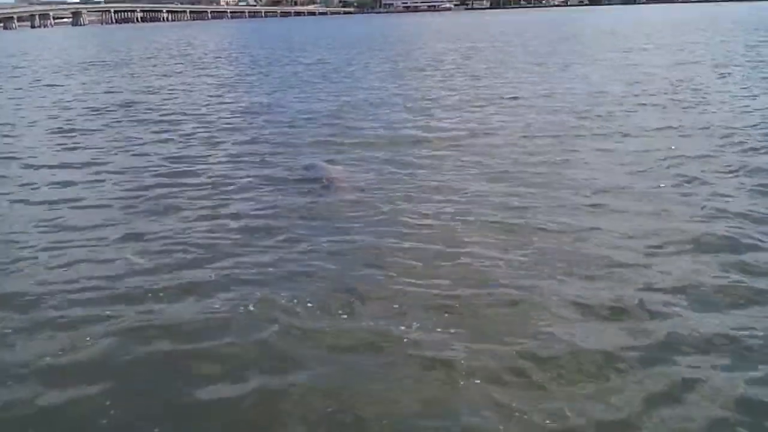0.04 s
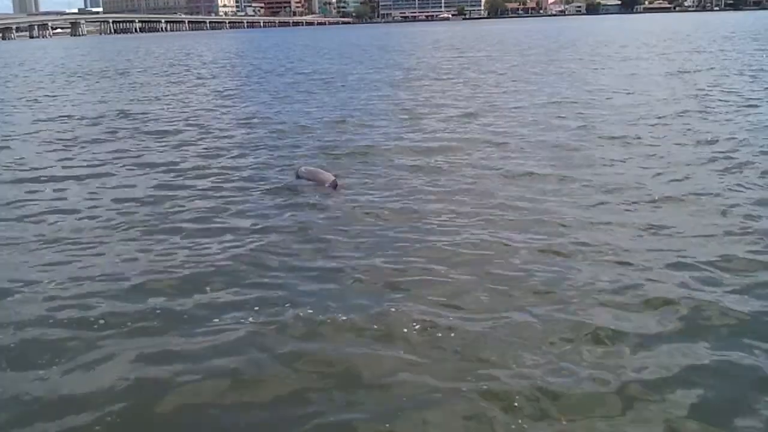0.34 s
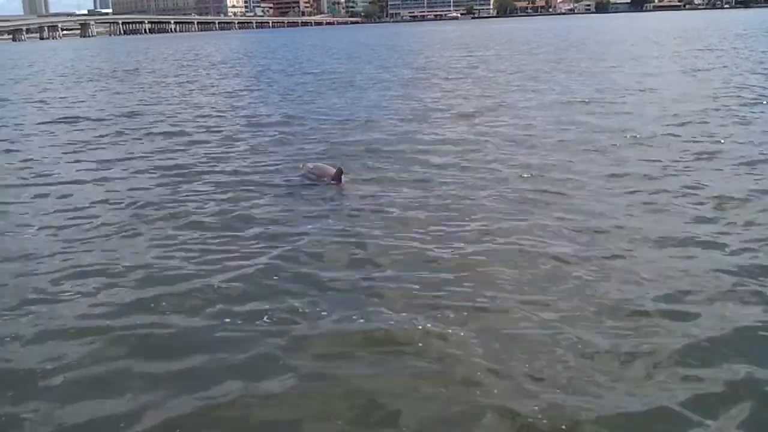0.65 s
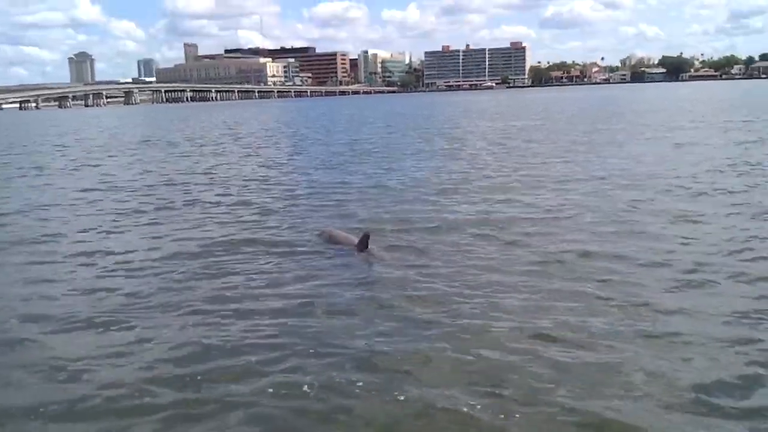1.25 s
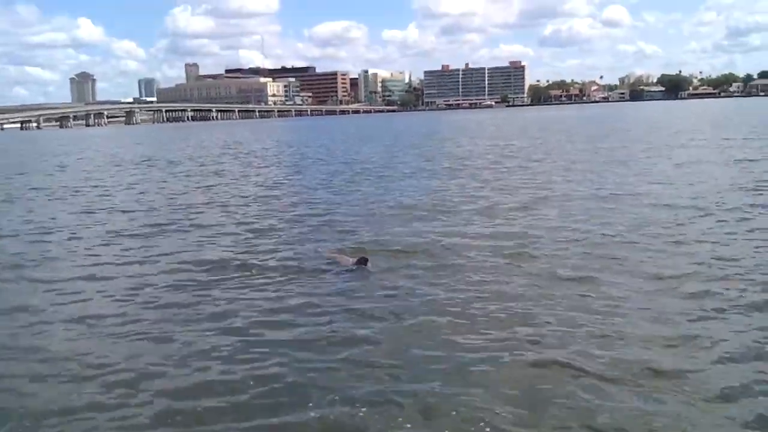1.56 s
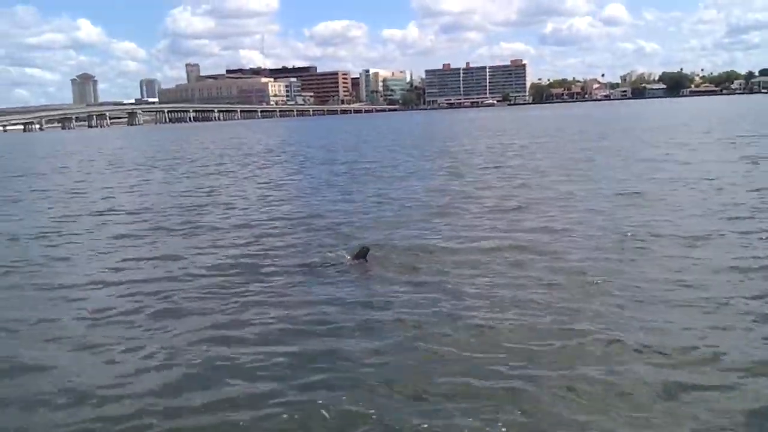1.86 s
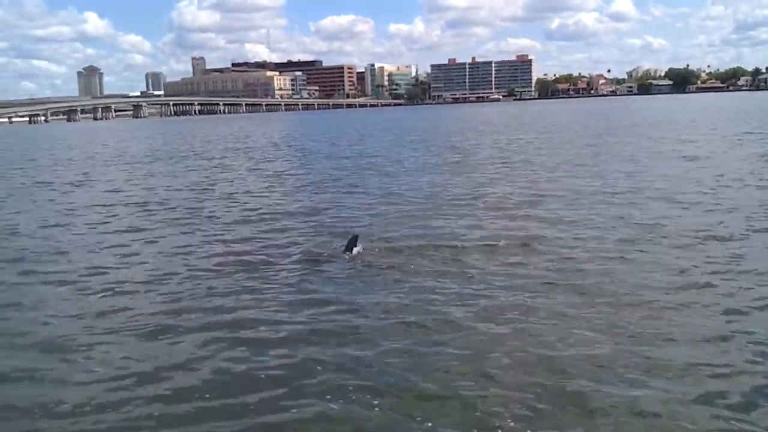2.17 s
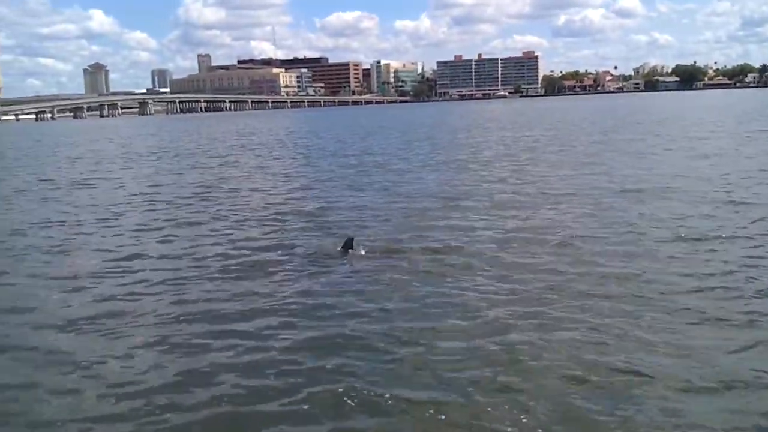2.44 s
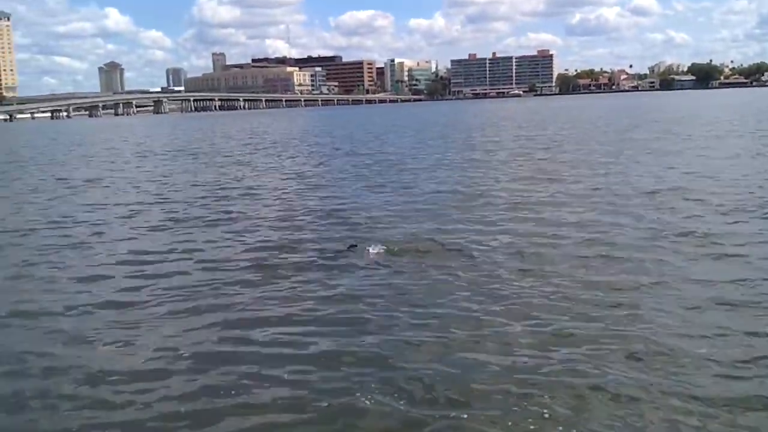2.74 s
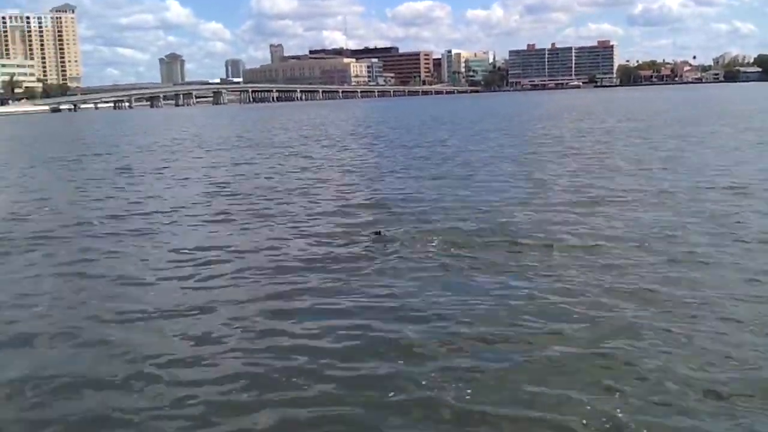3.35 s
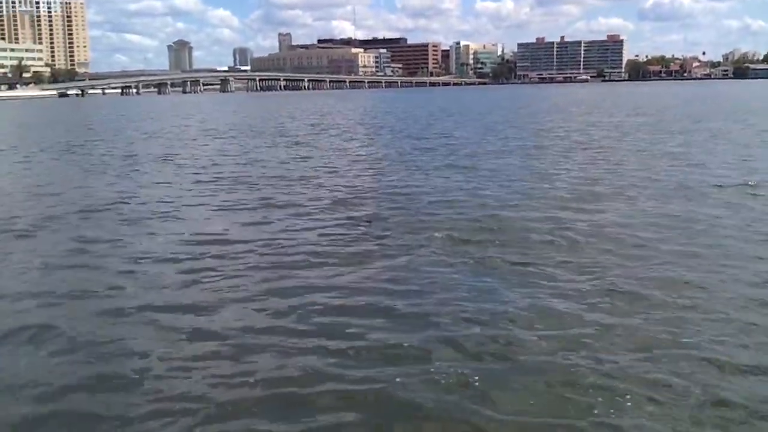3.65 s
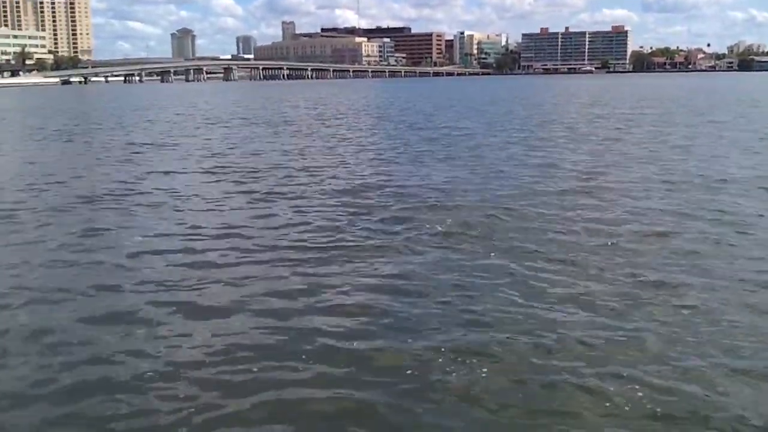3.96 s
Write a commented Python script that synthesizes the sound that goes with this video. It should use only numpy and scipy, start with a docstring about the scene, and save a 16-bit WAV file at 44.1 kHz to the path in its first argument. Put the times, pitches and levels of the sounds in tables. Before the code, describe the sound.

Low wind rumbles on the microphone throughout, over a distant traffic drone and faint wavelets lapping close by with tiny bubbles and drips. From about 1.1 to 1.5 seconds a dolphin blows once, a soft rush of air and spray. The wind buffets hardest between 1.4 and 1.9 seconds. From about 3.3 seconds to the end at 4, a low, hollow noise swells with soft water gurgles.

```python
"""Wind buffets the microphone in low eddies, over open water in a city bay on a breezy day.
Close by, wavelets lap in clusters of small ringing bubbles, with ticks of spray and soft gurgles.
Far off, the town drones with traffic and machinery, and a bird whistles faintly. Once, a rush of
air and spray swells and fades, probably the blow of a surfacing dolphin. Low, hollow noise swells
near the end."""
import sys
import numpy as np
from scipy import signal
from scipy.fft import rfft, irfft
from scipy.io import wavfile

SR = 44100
rng = np.random.default_rng(int(sys.argv[2]) if len(sys.argv) > 2 else 0)


def pcm_store(signal):
    """Save signal as 16-bit PCM."""
    levels = np.round(np.clip(np.atleast_2d(signal), -1, 1) * 32767)
    wavfile.write(sys.argv[1], SR, levels.astype(np.int16).T)


N = 176400
TIME = np.arange(N) / SR
BINS = np.fft.rfftfreq(N, 1 / SR)
CUTOFF_HZ = 8350

# Far wash of town and water. Each row: frequency in Hz, relative level in dB.
DRONE_SPECTRUM = [(20, -8.5), (60, 5.5), (125, -3.5), (180, -1), (280, -3), (380, -7), (470, -8.5),
                  (570, -11), (850, -12.5), (1200, -26), (1800, -29.5), (3000, -35.5), (4500, -42.5),
                  (7300, -43), (8500, -53.5)]
# Drift of that wash. Each row: time in seconds, gain in dB.
DRONE_GAIN = [(0, 1), (.5, 0.5), (1.0, 1), (1.5, 2), (2.1, 1), (2.7, 0.8), (3.2, 1.5), (3.7, -2), (4, 1)]
# Far traffic. Each row: frequency in Hz, relative level in dB.
TRAFFIC_SPECTRUM = [(50, -12), (95, 8), (150, -9), (500, -10.5), (850, -1), (1250, -10.5), (2000, -24),
                    (5000, -51.5)]
# Its swell. Each row: time in seconds, level in dB.
TRAFFIC_SWELL = [(0, -67.5), (1, -63.5), (1.8, -61), (2.4, -61.5), (2.9, -61.5), (3.3, -66), (4, -67.5)]
# Distant machinery. Each row: pitch in Hz, base level in dB, half width in Hz.
HUM_RINGS = [(177, -60.5, 9.9), (190.8, -63.5, 13), (269, -64.5, 11), (420.4, -67, 7.3), (1059, -77.5, 8.6),
             (2198, -87.5, 13)]
# Drift of its hum. Each row: time in seconds, gain in dB.
HUM_GAIN = [(0, -1), (1.5, -1), (2.1, -1), (2.85, 2.5), (3.3, 2), (4, -2)]
# Wind on the microphone. Each row: frequency in Hz, relative level in dB.
WIND_SPECTRUM = [(8, 6), (25, 0.5), (50, -6), (85, -8.5), (120, -20.5), (200, -22), (400, -39),
                 (1000, -55.5), (3000, -75)]
# Its strength. Each row: time in seconds, level in dB.
WIND_STRENGTH = [(0, -35.5), (.1, -37), (.3, -43), (.62, -44.5), (1.1, -40.5), (1.34, -40), (1.56, -49),
                 (1.74, -46.5), (1.86, -40.5), (2.0, -46), (2.9, -47.5), (3.15, -44), (3.35, -51),
                 (3.6, -45.5), (4, -43.5)]
# Single buffets. Each row: centre and length in seconds, level in dB, upper edge in Hz.
WIND_BUFFETS = [(0.036, 0.045, -39, 91), (0.217, 0.071, -40.5, 70), (0.246, 0.037, -44, 60),
                (1.404, 0.057, -33, 151), (1.511, 0.016, -32, 120), (1.536, 0.024, -31, 140),
                (1.586, 0.041, -34, 150), (1.656, 0.039, -36, 130), (1.809, .035, -34, 170),
                (1.843, 0.019, -45, 90), (3.158, 0.032, -44, 60), (3.573, 0.02, -41.5, 110)]
# Wavelets close by. Each row: centre and half length in seconds, strength in dB.
WAVELETS = [(0.032, .06, -73), (0.263, 0.025, -60.5), (0.603, 0.018, -62.5), (0.735, 0.068, -63),
            (1.239, 0.012, -54), (1.364, 0.084, -62), (1.55, 0.054, -62), (1.688, 0.035, -61),
            (2.096, 0.14, -68.5), (2.436, 0.13, -68.5), (2.806, 0.12, -63.5), (2.974, 0.089, -65),
            (3.08, .04, -64.5), (3.526, 0.11, -66.5), (3.618, 0.049, -64.5), (3.732, 0.063, -66.5),
            (3.95, .08, -79)]
# Clouds of small bubbles. Each row: pitch in Hz, relative weight in dB.
CLOUD_WEIGHTS = [(600, 0.5), (1100, 3), (1900, 0), (3000, 4.5), (4300, -5), (7500, -12)]
# Fizz of a wavelet. Each row: frequency in Hz, relative level in dB.
FIZZ_SPECTRUM = [(400, 8.5), (800, 10.5), (1300, 20), (2000, 5), (3100, 10), (4300, 2), (6500, -17.5),
                 (8500, -9.5)]
# The clearest bubbles. Each row: start in seconds, pitch in Hz, peak in dB, decay time in cycles.
CLEAR_BUBBLES = [(.259, 2400, -50, 3.3), (.356, 4560, -54, 4.3), (0.6156, 2200, -46, 3.4),
                 (0.6184, 2250, -48, 2.5), (.686, 2700, -48, 7), (.7175, 5100, -55, 5),
                 (0.72, 4900, -49.5, 2.9), (.7208, 1070, -48.5, 6.4), (.7314, 5500, -64, 3.2),
                 (0.755, 2730, -49.5, 5.6), (1.1579, 2870, -45.5, 5.9), (1.174, 1300, -44, 1.5),
                 (1.2374, 3190, -49, 9.4), (1.304, 2680, -51, 5.7), (1.3616, 1190, -38.5, 1.9),
                 (1.373, 6100, -50, 5.9), (1.46, 5340, -56, 5.4), (1.53, 3140, -56, 4.6),
                 (1.611, 2850, -45.5, 6.4), (1.6605, 2810, -52, 5.5), (2.0178, 2700, -53, 7.4),
                 (2.11, 2860, -45, 2), (2.4694, 1800, -55.5, 4.9), (2.6618, 2390, -53, 7),
                 (2.6625, 4480, -54.5, 5.1), (2.6846, 3120, -49, 4), (2.6916, 3080, -52, 5),
                 (2.709, 1070, -48, 5.6), (2.809, 2600, -52, 3), (2.889, 6100, -45.5, 1.3),
                 (2.9055, 1700, -50.5, 2.3), (3.0254, 3300, -50.5, 2.9), (3.037, 1150, -46, 2.7),
                 (3.043, 1300, -50, 4), (3.0518, 2600, -55, 3), (3.5149, 2600, -50, 3.4),
                 (3.5352, 2720, -54, 6.9), (3.598, 1670, -45, 2.5), (3.6152, 6600, -62, 4.8),
                 (3.6428, 1900, -49, 3), (3.8856, 2100, -49, 2)]
# Drops of spray. Each row: start in seconds, peak in dB.
SPRAY_TICKS = [(.259, -59), (0.307, -59), (0.609, -58), (.732, -55.5), (.761, -58), (1.966, -57),
               (2.602, -54), (2.784, -59), (2.8907, -51), (3.102, -68), (3.615, -56), (3.628, -55.5)]
# Gurgles. Each row: centre and length in seconds, pitch in Hz, peak in dB, glide in octaves a second.
WATER_GURGLES = [(0.71, 0.027, 630, -49, 1.5), (1.23, 0.047, 491, -57, 1.5), (3.401, .04, 590, -52.5, -5),
                 (3.415, .025, 317, -49.5, 0.5), (3.565, .04, 511.6, -54, -0.5),
                 (3.661, .04, 433, -49, -5.5), (3.722, 0.052, 450, -50.5, 0.5),
                 (3.877, 0.054, 312.3, -47.5, -5)]
# A far bird. Each row: start and length in seconds, top pitch and opening sag in Hz,
# place of the top from 0 to 1, peak in dB.
BIRD_WHISTLES = [(0.715, 0.14, 7220, 710, 0.9, -81), (0.857, 0.055, 7200, 228, 0.4, -80)]
# Rushing air of the blow. Each row: frequency in Hz, relative level in dB.
BLOW_SPECTRUM = [(200, -5.5), (500, 3), (800, 5), (1150, -2), (1500, -5), (1950, -7), (2300, -13),
                 (3300, -9.5), (4500, -26.5), (6500, -26), (8500, -39)]
# Its resonances. Each row: pitch in Hz, level at full blow in dB, half width in Hz.
BLOW_RESONANCES = [(1063, -59, 25), (1125, -61, 34), (1370, -64, 110), (1631, -68.5, 18), (2230, -68.5, 33)]
# Hiss of the blown spray. Each row: frequency in Hz, relative level in dB.
MIST_SPECTRUM = [(1000, -19.5), (3000, 4.5), (5000, -4.5), (6500, -3), (8500, -6.5)]
# Its swell. Each row: time in seconds, level in dB.
MIST_SWELL = [(1.0, -100), (1.16, -72), (1.24, -73), (1.31, -73), (1.375, -68), (1.44, -78.5), (1.7, -100)]
# Low, hollow noise. Each row: frequency in Hz, relative level in dB.
HOLLOW_SPECTRUM = [(150, -15), (250, -2), (310, 5.5), (380, -9), (450, 0), (600, -8.5), (900, -26.5),
                   (3000, -63)]
# Its late swell. Each row: time in seconds, level in dB.
HOLLOW_SWELL = [(0, -76.5), (3.1, -70), (3.4, -56.5), (3.7, -54), (4, -62)]


def amp(db):
    """Decibels to gain."""
    return 10 ** (np.asarray(db) / 20)


def unit(x):
    """Scales to rms 1."""
    return x / np.sqrt(np.mean(x ** 2) + 1e-20)


def spectrum(points, hz):
    """Gain of a (Hz, dB) table on a log-frequency axis."""
    f, db = np.transpose(points)
    return amp(np.interp(np.log(hz + 1), np.log(f + 1), db))


def level(points):
    """Gain over time from a (s, dB) table."""
    return amp(np.interp(TIME, *np.transpose(points)))


def noise(gain):
    """Noise of rms 1 with the given gain per frequency."""
    return unit(irfft(rfft(rng.standard_normal(N)) * gain, N))


def wander(rate_hz):
    """Slow random drift of rms 1."""
    return noise(1 / (1 + (BINS / rate_hz) ** 2) ** 2)


def rings(table):
    """Noise in narrow resonances."""
    return sum(amp(db) * noise(1 / (1 + ((BINS - hz) / width) ** 2)) for hz, db, width in table)


def add(mix, s, sound):
    """Mixes a sound in at time s."""
    part = mix[max(round(s * SR), 0):][:len(sound)]
    part += sound[:len(part)]


def far_town(wash_db=-49, waver_db=1.0):
    """The town from across open water: a wavering wash, a swell of traffic, a faint machine hum."""
    wash = amp(wash_db + waver_db * wander(14)) * noise(spectrum(DRONE_SPECTRUM, BINS))
    traffic = level(TRAFFIC_SWELL) * noise(spectrum(TRAFFIC_SPECTRUM, BINS))
    hum = level(HUM_GAIN) * rings(HUM_RINGS)
    return level(DRONE_GAIN) * wash + traffic + hum


def wind(lumpy_db=1.8, buffet_low_hz=34):
    """Turbulence rumbles right on the microphone, with short buffets; smaller eddies reach higher."""
    colour = spectrum(WIND_SPECTRUM, BINS)
    out = level(WIND_STRENGTH) * amp(lumpy_db * wander(12)) * noise(colour)
    low_cut = BINS ** 2 / (BINS ** 2 + buffet_low_hz ** 2)
    for centre, length, db, edge_hz in WIND_BUFFETS:
        eddies = noise(colour * low_cut / np.sqrt(1 + (BINS / edge_hz) ** 2))
        shape = np.exp(-(2 * (TIME - centre) / length) ** 2)
        buffet_rms = np.sqrt(np.average(eddies ** 2, weights=shape ** 2))
        out += amp(db) * shape * eddies / buffet_rms
    return out


def bubble(hz, cycles, rise=0.1, glide=0.04, splash_db=-21, splash_s=0.0028):
    """A bubble rings for a few cycles, rising slightly in pitch, with a tiny splash."""
    t = TIME[:1400]
    age = t * hz / cycles  # in decay times, the scale for rise and glide
    pitch = hz * (1 + glide * np.minimum(age, 2))
    shape = (1 - np.exp(-(age / rise) ** 2)) * np.exp(-age)
    ring = shape / shape.max() * np.sin(2 * np.pi * np.cumsum(pitch) / SR)
    band = signal.butter(1, [hz / 2, min(hz * 2, SR / 3)], "band", fs=SR)
    splash = unit(signal.lfilter(*band, rng.standard_normal(len(t))))
    return ring + amp(splash_db) * splash * np.exp(-t / splash_s)


def wavelets(pitches=28, bubbles_per_s=800, spread_db=4.6, calm_db=-74, cloud_db=-2.5, fizz_db=-5):
    """Close by, each wavelet frees a cloud of small bubbles and some fizz; a few bubbles stand out."""
    lap_power = sum(amp(db) ** 2 * np.exp(-((TIME - s) / half) ** 2) for s, half, db in WAVELETS)
    stir = np.sqrt(amp(calm_db) ** 2 + lap_power)
    cloud = np.zeros(N)
    for hz in np.geomspace(600, 7500, pitches):
        births = rng.random(N) < bubbles_per_s / pitches / SR
        strengths = amp(spread_db * np.minimum(rng.exponential(1, N), 3))
        pops = signal.oaconvolve(births * strengths, bubble(hz, cycles=rng.uniform(1, 4.5)))[:N]
        cloud += np.sqrt(hz) * spectrum(CLOUD_WEIGHTS, hz) * pops
    fizz = noise(spectrum(FIZZ_SPECTRUM, BINS))
    out = stir * (amp(cloud_db) * unit(cloud) + amp(fizz_db) * fizz)
    for start, hz, db, cycles in CLEAR_BUBBLES:
        add(out, start, amp(db) * bubble(hz, cycles))
    return out


def spray(decay_s=0.0015, low_hz=4430):
    """Tiny drops snap on the surface, each a bright tick."""
    out = np.zeros(N)
    t = TIME[:600]
    band = signal.butter(2, [low_hz, CUTOFF_HZ], "band", fs=SR)
    for start, db in SPRAY_TICKS:
        snap = rng.standard_normal(len(t)) * np.exp(-t / decay_s)
        tick = signal.lfilter(*band, snap)
        add(out, start, amp(db) * tick / abs(tick).max())
    return out


def gurgles():
    """The water gurgles softly in short, low, gliding tones."""
    out = np.zeros(N)
    for centre, length, hz, db, glide in WATER_GURGLES:
        t = np.arange(-length * 1.5, length * 1.5, 1 / SR)
        turns = np.cumsum(hz * 2 ** (glide * t)) / SR + rng.random()
        shape = np.exp(-(2 * t / length) ** 2)
        add(out, centre + t[0], amp(db) * shape * np.sin(2 * np.pi * turns))
    return out


def far_bird():
    """Thin whistles, arched in pitch and faint with distance."""
    out = np.zeros(N)
    for start, length, top_hz, sag_hz, top_at, db in BIRD_WHISTLES:
        progress = np.arange(0, length, 1 / SR) / length
        pitch = top_hz - sag_hz * (progress / top_at - 1) ** 2
        shape = np.sqrt(np.sin(np.pi * progress))
        add(out, start, amp(db) * shape * np.sin(2 * np.pi * np.cumsum(pitch) / SR))
    return out


def blow(start_s=1.117, rise_s=0.088, end_s=1.423, fall_s=0.01, rush_db=-54,
         echo_db=-6, echo_s=0.17, flutter_db=1.5):
    """Air rushes through a few resonances with a hiss of spray: rise, hold, quick release, echo."""
    attack = np.clip((TIME - start_s) / rise_s, 0, 1)
    after = np.maximum(TIME - end_s, 0)
    release = np.maximum(np.exp(-after / fall_s), amp(echo_db) * np.exp(-after / echo_s))
    air = amp(rush_db) * noise(spectrum(BLOW_SPECTRUM, BINS)) + rings(BLOW_RESONANCES)
    flutter = amp(flutter_db * wander(120))
    mist = level(MIST_SWELL) * noise(spectrum(MIST_SPECTRUM, BINS))
    return flutter * (attack * release * air + mist)


def hollow_swell():
    """Low, hollow noise comes up out of the background near the end."""
    return level(HOLLOW_SWELL) * noise(spectrum(HOLLOW_SPECTRUM, BINS))


def scene():
    """The bay, near and far, at one microphone."""
    return (far_town() + hollow_swell() + gurgles() + wind() + blow() + wavelets()
            + spray() + far_bird())[None]


def record(dry):
    """The recorder's band limit takes off the top treble."""
    low_pass = signal.firwin(201, CUTOFF_HZ, window=("kaiser", 8), fs=SR)
    return signal.oaconvolve(dry, low_pass[None], "same")


dry = scene()
out = record(dry)
pcm_store(out)
```